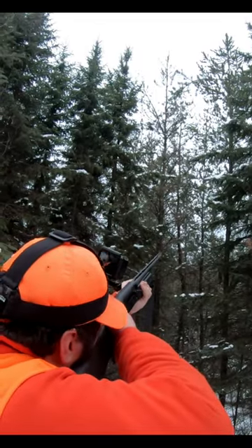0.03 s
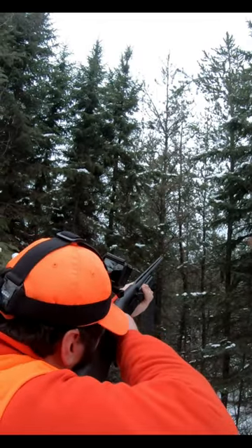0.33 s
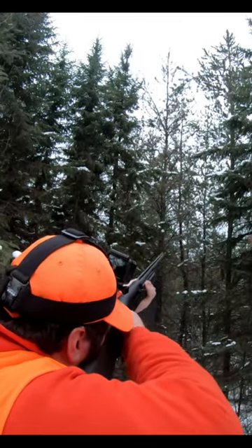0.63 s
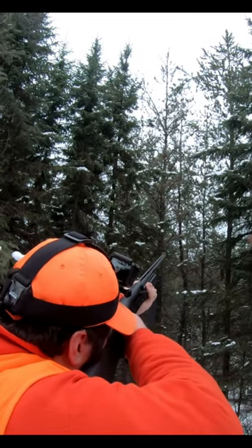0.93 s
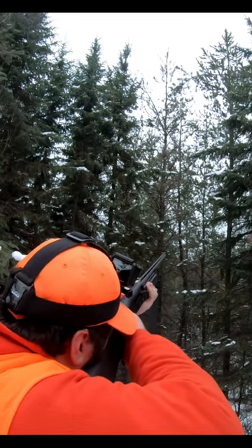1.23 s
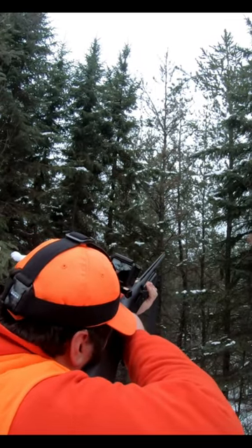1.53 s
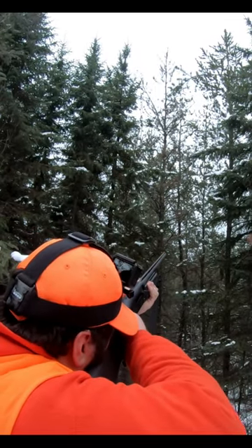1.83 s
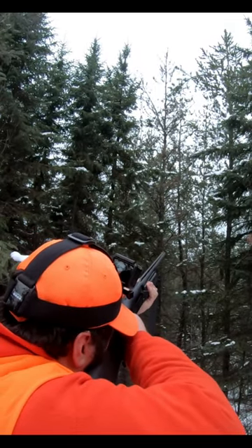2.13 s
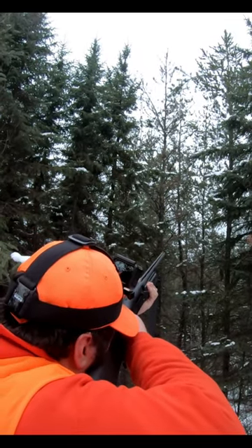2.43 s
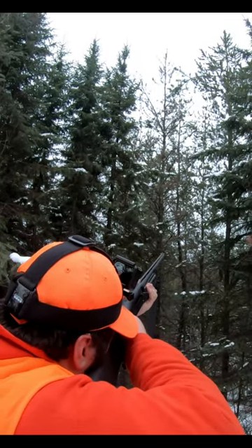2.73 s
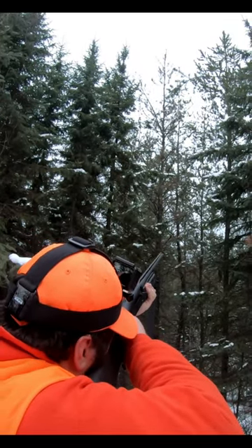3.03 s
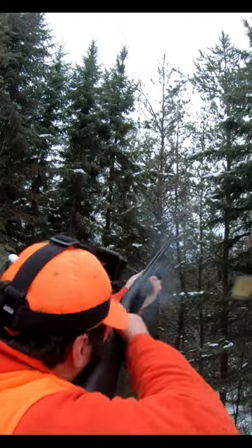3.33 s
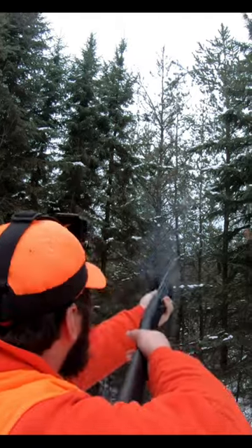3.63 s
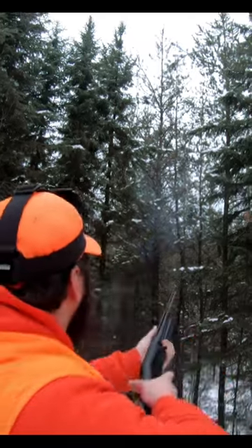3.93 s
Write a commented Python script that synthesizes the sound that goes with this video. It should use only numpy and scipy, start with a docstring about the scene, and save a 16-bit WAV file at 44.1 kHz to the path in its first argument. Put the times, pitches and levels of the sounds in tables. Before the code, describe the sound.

One close gunshot breaks the hush of a quiet forest, its sharp crack and low thump overloading the microphone. Faint clothing ticks come before it; an echo from the trees and a few bright handling clicks follow.

```python
"""A quiet snowy forest, just behind a shooter who fires one shot from a long gun.
Over a soft hush of air, sleeves slide and gear ticks faintly. The crack of the shot stutters in
and overloads the microphone, with a low thump under it. Near trunks scatter the sound, then the
far forest rolls it back. A few bright clicks come as the gun is lowered."""
import sys
import numpy as np
from scipy import signal
from scipy.fft import rfft, irfft
from scipy.io import wavfile
from scipy.ndimage import uniform_filter1d

SR = 44100
rng = np.random.default_rng(int(sys.argv[2]) if len(sys.argv) > 2 else 0)


def persist_wave(psi):
    """Save psi, clipped to +-1, as 16-bit WAV."""
    counts = np.round(np.clip(psi, -1, 1) * 32767).astype(np.int16)
    wavfile.write(sys.argv[1], SR, np.atleast_2d(counts).T)


N = 176400  # 4 seconds

# A TONE table says how strong low and high pitches are next to each other; loudness is set later.
# tone of the forest air (f/Hz, level/dB)
AIR_TONE = [(20, -25), (60, -16), (112, -34), (145, 0.5), (210, -0.5), (310, -6.5), (750, -7),
            (1600, -10.5), (2300, -20.5), (3200, -33.5), (4500, -41.5), (7000, -46), (9300, -43),
            (11000, -54.5), (16000, -62)]
# how alike the air is left and right (f/Hz, likeness: 1 = the same, 0 = unrelated)
AIR_LIKENESS = [(60, -0.011), (180, 0.91), (550, 0.62), (1650, 0.11), (4970, 0.44), (15000, -0.32)]
# boost or cut of the air's treble (t/s, level/dB)
AIR_TREBLE_CURVE = [(0, 3), (.6, 2.1), (1.2, 0.5), (1.7, -1.5), (2.3, -1), (2.8, -1), (3.2, -.5)]
# sleeve movements (middle t/s, half length/s, level/dB)
SLEEVE_STROKES = [(.03, 0.047, -75.5), (0.424, 0.2, -82.5), (0.695, .035, -77.5), (0.81, 0.029, -76.5),
                  (1.2, 0.24, -81), (3.877, 0.028, -56)]
# tone of sliding cloth (f/Hz, level/dB)
SLEEVE_TONE = [(1000, -6), (2800, 8), (5000, -4.5), (6000, -12), (9000, -12.5), (12000, -28), (16000, -34)]
# ticks of clothing and gear while aiming (t/s, level/dB, ring f/Hz)
GEAR_TICKS = [(0.62, -50, 4300), (0.662, -40.5, 4460), (.6905, -48, 4400), (.701, -48, 4600),
              (0.7255, -46, 3170), (0.7764, -46, 4370), (0.7996, -43, 4830), (0.9253, -39.5, 3860),
              (.938, -47, 4470)]
# tone of a tick (f/Hz, level/dB)
TICK_TONE = [(1000, -24), (2800, 1), (4000, 0), (5300, -1.5), (6100, -21), (9000, -18), (12000, -29),
             (16000, -45)]
# clicks as the gun is lowered (t/s, level/dB)
GUN_CLICKS = [(3.9715, -30), (3.983, -34), (3.9895, -30.5), (3.997, -38)]
# tone of a click (f/Hz, level/dB)
CLICK_TONE = [(3000, -30), (5500, -11), (6600, 2), (8500, -1), (11000, -18), (15000, -29)]
# how alike echoes, sleeves and rush are left and right (f/Hz, likeness: 1 or more = the same)
NOISE_LIKENESS = [(60, 1.5), (170, 3), (400, 1.27), (950, 0), (2400, .5), (6000, .5), (15000, -0.6)]
# how much louder the fading echoes are on the right (f/Hz, level/dB)
ECHO_RIGHT_LEAN = [(150, -0.5), (400, 2), (1000, 2), (6000, 2.5)]
# tone of the far forest's echo (f/Hz, level/dB)
FAR_TONE = [(60, -41), (110, -32), (150, -10), (200, -8), (290, -9.5), (420, 1), (560, -2.5), (740, -8),
            (970, -5.5), (1300, -10), (2050, -14), (3000, -20.5), (4400, -29), (5800, -43.5), (8700, -46),
            (10500, -55.5), (12000, -76), (15000, -85)]
# time the far echo takes to fade by 60 dB (f/Hz, t/s)
FAR_FADE = [(100, 1.9), (220, 2.7), (480, 2.94), (1000, 3.17), (2200, 1.8), (4500, 0.77), (9000, 0.42)]
# tone of the scatter from near trees (f/Hz, level/dB)
NEAR_TONE = [(20, -19), (45, -8), (90, -1.5), (130, -2.5), (240, -2.5), (400, -5), (560, -8), (800, -12),
             (2100, -14.5), (3000, -17), (3800, -20.5), (4700, -22.5), (5800, -27), (7500, -26.5),
             (9800, -25.5), (11500, -46), (14500, -41), (15500, -68)]
# time the near scatter takes to fade by 60 dB (f/Hz, t/s)
NEAR_FADE = [(50, 0.85), (110, .8), (200, 2.5), (500, 4.9), (1500, 2.1), (4000, 1.72), (8000, 0.92),
             (14000, 0.54)]
# single trunks that answer clearly (t/s, level/dB)
TRUNK_ECHOES = [(3.2862, -5.5), (3.2925, -5), (3.3035, -6), (3.3252, -6), (3.3560, -14), (3.3985, -13)]
# tone of the rush under the stutters (f/Hz, level/dB)
RUSH_TONE = [(30, -1), (150, 7), (500, -7.5), (800, 10), (1080, 4), (1500, -23.5), (3300, -13),
             (5500, -9.5), (10000, -14.5), (13500, -34), (15500, -58)]
# tone of the blast pushing on the microphone (f/Hz, level/dB)
BUFFET_TONE = [(15, -2), (45, -6), (100, -13), (250, -12), (1000, -43), (4000, -77)]
# low notes of the muzzle blast (f/Hz, level/dB, t/s to fade by 60 dB)
THUMP_NOTES = [(56, -5.5, .045), (89.5, -8, 0.043), (139.5, 0.5, 0.043), (210, 2.5, 0.044)]
# low thumps of the blast (t/s, level/dB)
THUMP_HITS = [(3.2490, 7), (3.262, 9), (3.2712, 3)]
# the weaker stutters and, last, the main crack (t/s, level/dB)
CRACK_HITS = [(3.218, -20.5), (3.2293, -14.5), (3.2395, 3), (3.2504, 9), (3.2568, 5), (3.2606, 15.5)]
# tone of the crack (f/Hz, level/dB)
CRACK_TONE = [(100, -12.5), (400, -2.5), (800, 1.5), (1080, -1), (1400, -2), (1750, 1), (2150, 3.5),
              (2700, -5), (3350, 5), (3900, -10), (4500, -2.5), (5400, -15.5), (6500, -10.5), (7500, -12),
              (8400, -24), (9700, -15), (13000, -30.5), (16000, -64)]

SHOT_S = 3.261
LEAD_S = 0.004  # a puff peaks this long after it starts
TIME = np.arange(N) / SR
LEAN_RIGHT = np.array([[-0.5], [0.5]])  # splits a gap in dB: left down, right up


def amp(db):
    """Turns decibels into a number to multiply by."""
    return 10 ** (np.asarray(db) / 20)


def unit(x):
    """Scales a sound to an average energy of one per channel."""
    return x / np.sqrt(np.mean(np.sum(x ** 2, -1)) + 1e-20)


def look_up(table, hz):
    """Reads between a table's rows along a pitch (log-frequency) scale."""
    f, value = np.transpose(table)
    return np.interp(np.log(hz + 1), np.log(f + 1), value)


def add(mix, s, sound):
    """Mixes a sound in at s seconds."""
    part = mix[:, round(s * SR):][:, :sound.shape[-1]]
    part += sound[..., :part.shape[1]]


def colour(x, tone, size=2048):
    """Gives a sound a tone, with no ringing ahead of it; the result has an energy of one."""
    log_gain = np.log(amp(look_up(tone, abs(np.fft.fftfreq(size, 1 / SR)))))
    response = np.fft.ifft(np.exp(np.conj(signal.hilbert(log_gain)))).real[:size // 2]
    return unit(signal.fftconvolve(x, response[None], axes=1))


def drift(max_hz):
    """A random wobble, typically of size one, no faster than max_hz."""
    wobble = irfft(rfft(rng.standard_normal(N)) * (np.fft.rfftfreq(N, 1 / SR) < max_hz), N)
    return wobble / wobble.std()


def wash(tone, likeness, grain_db=0):
    """Long stereo noise of strength one; grain_db clumps it into many tiny arrivals."""
    hz = np.fft.rfftfreq(N, 1 / SR)
    mid, side = rfft(rng.standard_normal((2, N)) * amp(grain_db * drift(700)))
    alike = np.clip(look_up(likeness, hz), -1, 1)
    mid = mid * np.sqrt(1 + alike)  # what left and right share
    side = side * np.sqrt(1 - alike)  # what sets them apart
    spectrum = np.array([mid + side, mid - side]) * amp(look_up(tone, hz))
    return unit(irfft(spectrum, N)) * np.sqrt(N)


def puff(decay_s, side_db, rise_s=0.00023, size=2048):
    """A short burst of noise, even at all pitches; more side_db makes it wider."""
    t = np.arange(size) / SR - LEAD_S
    shape = np.exp(np.minimum(t / rise_s, -t / decay_s))
    spectrum = rfft(rng.standard_normal((2, size)) * shape)
    bumps = np.sqrt(uniform_filter1d(abs(spectrum) ** 2, size=9) + 1e-12)
    mid, side = irfft(spectrum / bumps, size)
    return unit(mid + amp(side_db) * np.array([side, -side]))


def snaps(hits, tone, decay_s, side_db):
    """A fresh puff with the given tone for each hit."""
    out = np.zeros((2, N))
    for s, db in hits:
        add(out, s - LEAD_S, amp(db) * colour(puff(decay_s, side_db), tone))
    return out


def die_away(echo, start_s, fade_times, size=2048):
    """Fades each pitch of an echo at its own speed from start_s; all but the bass leans right."""
    hz, t, bands = signal.stft(echo, SR, nperseg=size)
    fall_db = -60 * np.maximum(t - start_s, 0) / look_up(fade_times, hz)[:, None]
    lean_db = LEAN_RIGHT[:, None] * look_up(ECHO_RIGHT_LEAN, hz)[:, None]
    return signal.istft(bands * amp(fall_db + lean_db), SR, nperseg=size)[1][:, :N]


def air(level_db=-54.5, lean_db=3.5, wobble_db=0.56, treble_hz=1490):
    """The forest air: a soft, slightly wavering hush whose treble slowly dulls."""
    hush = wash(AIR_TONE, AIR_LIKENESS)
    treble = signal.sosfiltfilt(signal.butter(2, treble_hz, "high", fs=SR, output="sos"), hush)
    treble_db = np.interp(TIME, *np.transpose(AIR_TREBLE_CURVE))
    hush = hush + (amp(treble_db) - 1) * treble
    return amp(level_db + lean_db * LEAN_RIGHT + wobble_db * drift(6.8)) * hush


def sleeves():
    """Cloth slides in soft, grainy swishes as the shooter moves."""
    strokes = sum(amp(db) * np.exp(-0.5 * ((TIME - s) / half) ** 2) for s, half, db in SLEEVE_STROKES)
    return strokes * wash(SLEEVE_TONE, NOISE_LIKENESS, grain_db=2)


def gear_ticks(ring_db=-5, ring_s=0.003):
    """Clothing and gear make small scuffs, each with a brief ring of its own."""
    t = np.arange(2048) / SR
    out = np.zeros((2, N))
    for s, db, hz in GEAR_TICKS:
        scuff = colour(puff(decay_s=0.0026, side_db=-12), TICK_TONE)
        ring = unit(np.exp(-t / ring_s) * np.sin(2 * np.pi * hz * t))
        add(out, s - LEAD_S, amp(db) * scuff)
        add(out, s, amp(db + ring_db) * ring)
    return out


def gun_clicks():
    """The gun clicks brightly as it is lowered."""
    return snaps(GUN_CLICKS, CLICK_TONE, decay_s=0.003, side_db=2.5)


def far_forest(peak_s=3.595, level_db=-25.5, rise_db_per_s=53, flutter_db=0.5):
    """Far trees send back a duller echo that peaks a third of a second after the shot and rolls away."""
    swell_db = rise_db_per_s * np.minimum(TIME - peak_s, 0)
    crest_db = 2.5 * np.exp(-0.5 * ((TIME - peak_s) / 0.071) ** 2)  # the densest trees answer
    gain = amp(level_db + swell_db + crest_db + flutter_db * drift(27)) * (TIME > SHOT_S)
    return gain * die_away(wash(FAR_TONE, NOISE_LIKENESS, grain_db=1), peak_s, FAR_FADE)


def near_trees(level_db=-26, rise_s=0.018):
    """Trunks and branches around the shooter scatter the shot into many tiny echoes."""
    rise = np.clip((TIME - SHOT_S) / rise_s, 0, 1)
    scatter = wash(NEAR_TONE, NOISE_LIKENESS, grain_db=2.5)
    return amp(level_db) * rise * die_away(scatter, SHOT_S, NEAR_FADE)


def single_trunks():
    """A few trunks each throw back a clear echo of the crack."""
    return snaps(TRUNK_ECHOES, CRACK_TONE, decay_s=0.0024, side_db=-4.5)


def rush(level_db=-15, rise_db_per_s=764, fall_db_per_s=2995):
    """Noise swells from the first stutter and dies quickly after the main crack."""
    t = TIME - SHOT_S
    swell_db = np.minimum(rise_db_per_s * t, -fall_db_per_s * t)
    started = TIME > CRACK_HITS[0][0]
    return amp(level_db + swell_db) * started * wash(RUSH_TONE, NOISE_LIKENESS, grain_db=4)


def buffet():
    """The blast shoves each opening of the microphone differently: one deep, wide puff."""
    return snaps([(SHOT_S, 5)], BUFFET_TONE, decay_s=0.0074, side_db=10)


def thumps(rise_s=0.0023):
    """The muzzle blast rings briefly on a few low notes."""
    t = np.arange(SR // 5) / SR
    ring = sum(amp(db - 60 * t / fade_s) * np.sin(2 * np.pi * hz * t) for hz, db, fade_s in THUMP_NOTES)
    thump = unit(-ring * (1 - np.exp(-t / rise_s)))
    out = np.zeros((2, N))
    for s, db in THUMP_HITS:
        add(out, s, amp(db) * thump)
    return out


def crack():
    """The crack stutters in: weaker copies come just before the sharp main crack."""
    core = puff(decay_s=0.0012, side_db=-14)
    spray = amp(-14.5) * puff(decay_s=0.0036, side_db=9)  # softer, longer and wider
    burst = colour(core + spray, CRACK_TONE)
    out = np.zeros((2, N))
    for s, db in CRACK_HITS:
        add(out, s - LEAD_S, amp(db) * burst)
    return out


def scene():
    """Adds up the shot, its echoes, the handling and the air."""
    shot = (crack() + thumps() + buffet() + rush()) * amp(2 * LEAN_RIGHT)
    echoes = near_trees() + far_forest() + single_trunks()
    handling = sleeves() + gear_ticks() + gun_clicks()
    return shot + echoes + handling + air()


def record(dry, low_cut_hz=25, high_cut_hz=15800):
    """The microphone drops the deepest bass, overloads on the crack and loses the highest treble."""
    thinned = signal.sosfilt(signal.butter(2, low_cut_hz, "high", fs=SR, output="sos"), dry)
    clipped = np.clip(thinned, -1, 1)
    treble_cut = signal.firwin(255, high_cut_hz, window=("kaiser", 8), fs=SR)
    return signal.oaconvolve(clipped, treble_cut[None], "same")


dry = scene()
out = record(dry)
persist_wave(out)
```